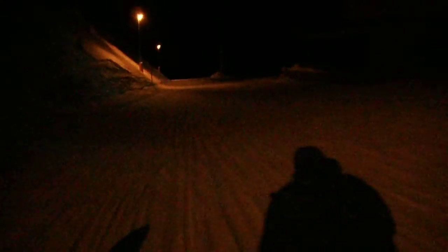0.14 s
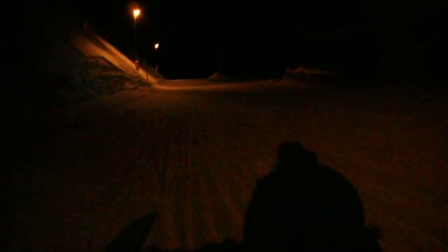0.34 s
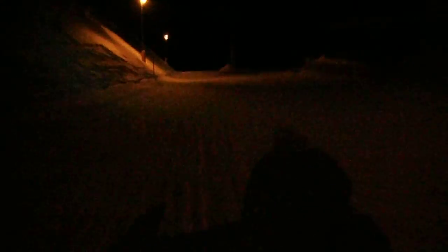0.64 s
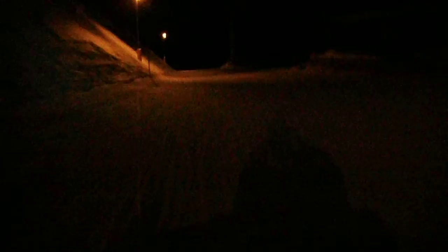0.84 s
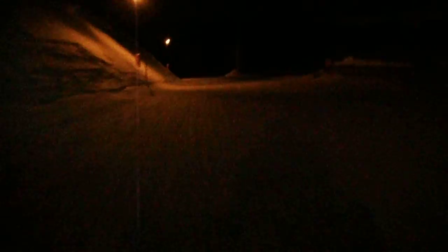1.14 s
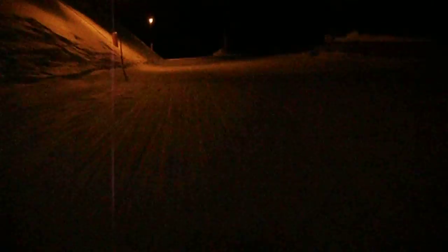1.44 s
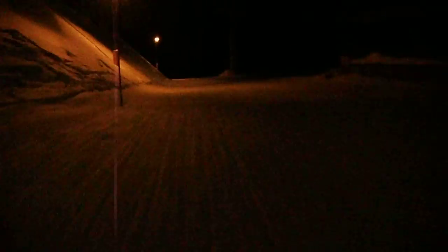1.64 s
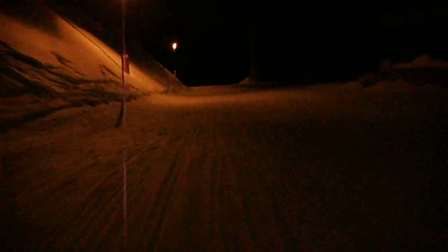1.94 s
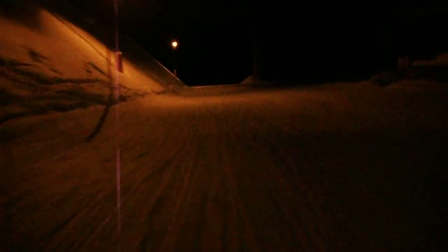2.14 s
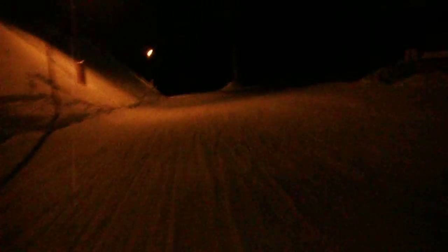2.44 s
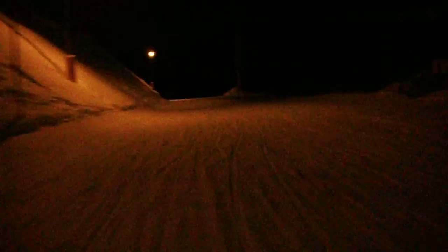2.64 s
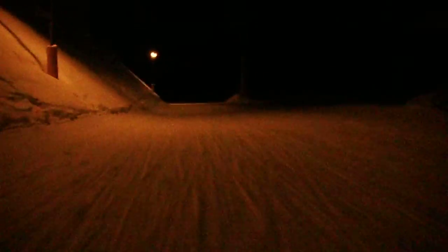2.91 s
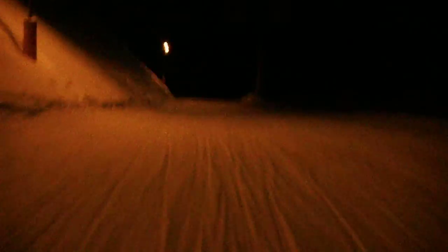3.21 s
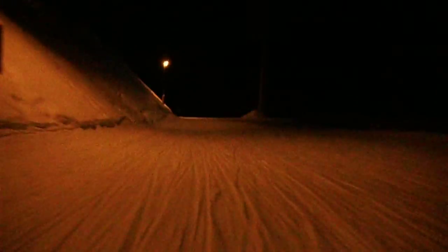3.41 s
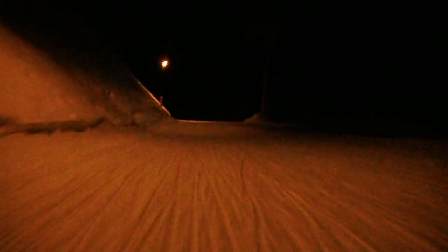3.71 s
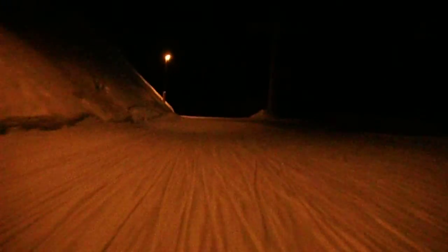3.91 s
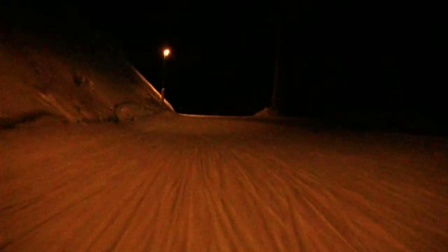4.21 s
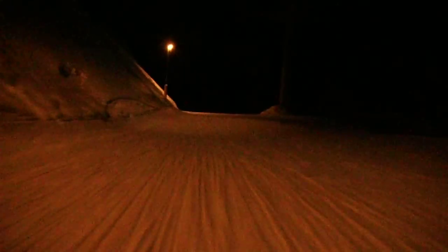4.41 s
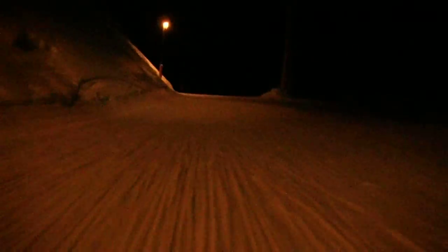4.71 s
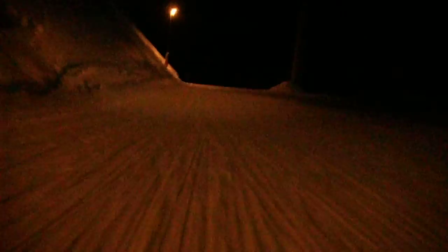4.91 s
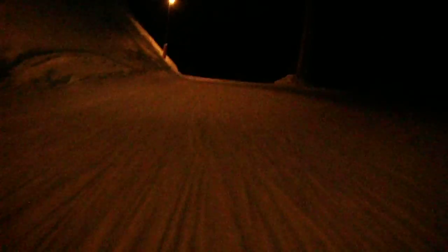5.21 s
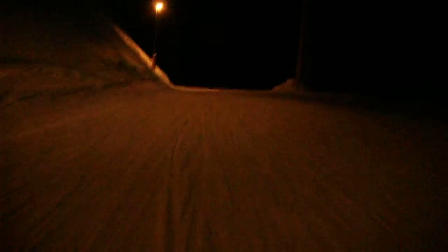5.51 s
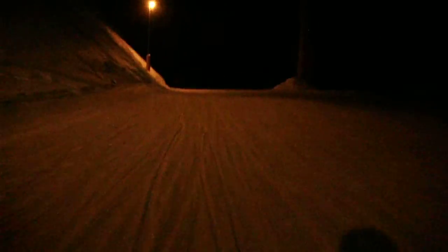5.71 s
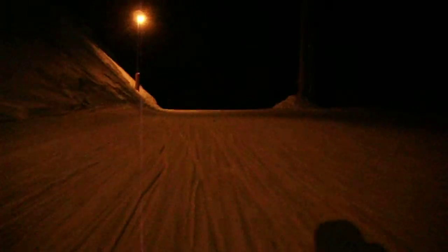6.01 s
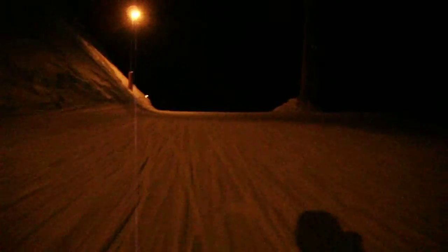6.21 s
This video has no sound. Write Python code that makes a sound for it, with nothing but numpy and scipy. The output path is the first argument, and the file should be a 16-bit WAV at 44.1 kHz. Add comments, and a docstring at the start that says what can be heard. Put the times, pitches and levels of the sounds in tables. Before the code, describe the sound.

A sled slides quickly down packed snow, giving a constant bright hiss and grainy scrape above a weak low rumble. Almost a second in, a short creak leads to a hard cracking bump that overloads the microphone; the sound drops suddenly and swells back. Scraping surges soon after, then continues with small crust cracks and faint thumps. Outdoors, close and dry, from a small microphone in a closed case.

```python
"""Snow grains scrape and spray under a sled's hull sliding over packed snow, above a low rumble.
Filtered noise makes the scrape, spray and rumble; short noise bursts make lumps of crust crack.
Damped sines thump, a narrow resonance creaks and thin steady tones whine.
One small mono microphone in a closed case hears it all, the same on both channels.
One hard bump overloads the input: the gain control ducks, then climbs back."""
import sys
import numpy as np
from scipy import signal
from scipy.fft import rfft, irfft
from scipy.io import wavfile

SR = 44100
rng = np.random.default_rng(int(sys.argv[2]) if len(sys.argv) > 2 else 0)


def wav_record(signal):
    """Record a signal, one row per channel, as 16-bit PCM in the file named by sys.argv[1]."""
    frames = np.transpose(np.atleast_2d(signal))
    bounded = np.clip(frames, -1, 1)
    # unit amplitude maps onto the largest positive 16-bit level
    quanta = np.round(bounded * 32767).astype(np.int16)
    wavfile.write(sys.argv[1], SR, quanta)


def rack_gain(trim_db):
    """Turn a fader trim in dB into the linear factor to multiply a signal by."""
    fader = np.asarray(trim_db, float)
    return 10 ** (fader / 20)


N = 280035  # samples

# colour of snow sounds through the case: (frequency [Hz], relative density [dB per Hz])
SNOW_COLOUR = [(410, -49), (700, -24), (1360, -16.5), (1500, -10), (1880, -2), (2330, -2.5), (2540, -1),
               (4050, -5), (6380, -10), (8280, -4.5), (9430, -7.5), (11900, -7), (13800, -24.5),
               (15700, -29)]
# resonances of the case, added to a colour: (centre [Hz], width [Hz], height [dB])
CASE_RESONANCES = [(1900, 330, 1), (2576, 240, 4), (3136, 390, 4.5), (3680, 120, 3.5), (5650, 1800, 2.5),
                   (8230, 1360, 5.5), (10400, 630, 3)]


def rms_one(x):
    """Normalisation: scale a signal to unit rms."""
    return x / np.sqrt(np.mean(x ** 2) + 1e-20)


def in_time(rows):
    """Linear interpolation: the columns of a curve at every sample."""
    s, *columns = np.transpose(rows)
    return [np.interp(np.arange(N) / SR, s, c) for c in columns]


def drift(rate_hz):
    """Low-pass random process of unit rms: white noise twice through a one-pole filter."""
    r = np.exp(-2 * np.pi * rate_hz / SR)
    wander = signal.lfilter([1], [1, -2 * r, r * r], rng.standard_normal(N + SR))
    return rms_one(wander[SR:])  # the first second lets the filter settle


def resonance(x, hz, width_hz):
    """Damped resonator: a pole pair whose radius sets the width, with gain about 1 on top."""
    r = np.exp(-np.pi * width_hz / SR)
    zeros = [(1 - r * r) / 2, 0, (r * r - 1) / 2]
    poles = [1, -2 * r * np.cos(2 * np.pi * hz / SR), r * r]
    return signal.lfilter(zeros, poles, x)


def colour(x, spectrum, modes=()):
    """Minimum-phase filtering: a folded cepstrum gives the response; white noise keeps its rms."""
    hz = np.fft.rfftfreq(4096, 1 / SR) + 1  # the 1 avoids log(0)
    corner_hz, corner_db = np.transpose(spectrum)
    db = np.interp(np.log(hz), np.log(corner_hz), corner_db)
    for centre, width, top_db in modes:
        db = db + top_db / (1 + (2 * (hz - centre) / width) ** 2)
    cepstrum = irfft(np.log(rack_gain(db)))
    cepstrum[1:2048] *= 2
    cepstrum[2049:] = 0
    response = irfft(np.exp(rfft(cepstrum)))
    return signal.fftconvolve(x, response / np.sqrt(np.sum(response ** 2)))[:N]


def whines():
    """Pure tones: steady sinusoids from the electronics."""
    # electronic tones: (frequency [Hz], rms level ahead of the gain control [dB])
    tones = [(11719, -61), (15676, -72), (15735, -60)]
    t = np.arange(N) / SR
    return sum(rack_gain(db) * np.sqrt(2) * np.sin(2 * np.pi * hz * t) for hz, db in tones)


def rumble(bite_db):
    """Low-frequency turbulence and vibration: lumpy noise of wind on the case and the hull shaking."""
    # colour of the rumble: (frequency [Hz], relative density [dB per Hz])
    low_colour = [(8.8, -32), (15, 0.5), (44, -1), (96, -7), (301, -5.5), (400, -9), (532, -6.5),
                  (777, -15), (1400, -14.5), (1820, -29), (3080, -120)]
    start_db, sag_db_per_s = -38.5, 0.53
    follows = 0.41  # share of the bite's swing
    faded_db = start_db - sag_db_per_s * np.arange(N) / SR
    level_db = faded_db + follows * (bite_db - bite_db.mean())
    lumps = rack_gain(0.4 * drift(28) + 0.89 * drift(56) + 0.72 * drift(4.9))
    noise = rms_one(lumps * rng.standard_normal(N))
    return rack_gain(level_db) * colour(noise, low_colour)


def thumps():
    """Damped free vibration: each bump sets off a few decaying cycles of the hull."""
    # hull on bumps: (time [s], level, above the actual peak [dB], frequency [Hz])
    bumps = [(0.738, -26, 227), (.922, -32, 95), (.925, -25, 205), (.928, -18.5, 463), (1.033, -29, 200),
             (2.36, -27, 700), (2.37, -26.5, 247), (2.599, -38, 318), (4.754, -29, 297), (5.03, -26.5, 443),
             (5.323, -27.5, 473)]
    out, t = np.zeros(N), np.arange(4096) / SR
    for s, level_db, hz in bumps:
        cycles = t * hz
        envelope = cycles * np.exp(1 - cycles / 0.89) / 1.5
        at = round(s * SR)
        out[at:at + len(t)] += rack_gain(level_db) * np.sin(2 * np.pi * cycles) * envelope
    return out


def creak():
    """Excited resonance: slips, taken as noise, ring one narrow mode of the hull before the bump."""
    start_s, rise_s, hold_s, fall_s = 0.855, .015, .055, .01
    level_db, mode_hz, width_hz = -29.5, 1510, 120  # rms while held; width of each of two stages
    corners = start_s + np.cumsum([0, rise_s, hold_s, fall_s])
    envelope = np.interp(np.arange(N) / SR, corners, [0, 1, 1, 0])
    ringing = resonance(rng.standard_normal(N), mode_hz, width_hz)
    ringing = resonance(ringing, mode_hz, width_hz)
    return rack_gain(level_db) * envelope * rms_one(ringing)


def small_cracks():
    """Random fracture: crack rows drawn uniformly in time, level, frequency and length."""
    count = 14
    # lowest and highest time [s], peak [dB], centre [Hz], burst length [ms]
    ranges = np.array([(0, N / SR - .1), (-24, -9.5), (2400, 3400), (3, 8.5)])
    low, high = ranges.T
    return list(low + rng.random((count, 4)) * (high - low))


def cracks():
    """Brittle fracture: each crack is a short burst of splinters, part around its pitch, part broad."""
    # crust cracks: (time [s], peak ahead of the gain control [dB], centre [Hz],
    # burst length before ringing [ms])
    crust = [(0.042, -22, 2500, 4.7), (0.416, -17, 3050, 4.4), (.463, -9.5, 2250, 4), (.897, -12, 4500, 7),
             (.903, -6.5, 2500, 6), (.909, -10, 1900, 9), (.9265, -7, 2300, 6), (.9290, 0, 4700, 3),
             (.9335, 0, 3300, 7), (.962, -7, 3340, 6), (.976, -9, 2600, 3), (.982, -12, 3200, 4),
             (.992, -10, 2700, 4), (1.0, -10, 4500, 4), (1.031, -10, 1900, 7), (1.609, -10, 3220, 5),
             (2.358, -14, 2450, 8.8), (2.444, -10, 5000, 6), (2.853, -15, 2870, 3.7), (2.883, -11, 3290, 4),
             (3.091, -16, 3150, 5), (3.114, -12, 2580, 3.8), (3.128, -15, 2630, 4.7),
             (3.554, -7.5, 3170, 7.9), (3.797, -10, 3000, 8.5), (3.93, -10, 1900, 2.9),
             (4.325, -8.5, 3320, 4.4), (4.452, -14, 2570, 5), (5.309, -10, 2730, 2.9),
             (5.328, -9.5, 3300, 3.4)]
    out, t = np.zeros(N), np.arange(2048) / SR
    rows = crust + small_cracks()
    splinters = rng.standard_normal((len(rows), len(t)))
    for (s, peak_db, hz, ms), noise in zip(rows, splinters):
        shape = np.sin(np.pi * np.minimum(t / ms * 1000, 1) ** .7)  # quicker rise than fall
        burst = noise * shape
        burst = burst + 3.8 * resonance(burst, hz, 390)
        burst = colour(burst, SNOW_COLOUR, CASE_RESONANCES)[:len(t)]
        at = round(s * SR)
        out[at:at + len(t)] += rack_gain(peak_db) * burst / np.max(np.abs(burst))
    return out


def grains(per_s, spread_db):
    """Random impulse process: clicks at chance moments, most small and a few large; unit rms."""
    sizes = rack_gain(spread_db * np.minimum(rng.exponential(1, N), 5))
    signs = rng.choice([-1, 1], N)
    return rms_one(sizes * signs * (rng.random(N) < per_s / SR))


def rubbing():
    """Granular friction: dense grain impacts on hiss, fluttering together over the ruts."""
    flutter = rack_gain(0.15 * drift(13) + 0.83 * drift(130))
    crunch = grains(2500, spread_db=2.5) * rack_gain(2.6 * drift(39))
    return rms_one(flutter * (rng.standard_normal(N) + rack_gain(-11.5) * rms_one(crunch)))


def snow(bite_db):
    """Band-wise modulated friction noise: a low scrape and a high spray, each band with own patches."""
    # centres of overlapping bands: (frequency [Hz])
    band_centres = [300, 1400, 1950, 2550, 3150, 3750, 4600, 6200, 8200, 10500, 12500, 16500]
    # coarse snow scrapes low, fine snow high; it tilts the scrape: (time [s], grit frequency [Hz])
    grit_curve = [(0, 2860), (1.5, 2860), (2.2, 2850), (2.4, 2650), (2.72, 2650), (2.9, 2880), (3.3, 2730),
                  (3.55, 2940), (4.15, 2830), (4.35, 2980), (4.7, 2950), (4.9, 2830), (6.35, 2850)]
    # slow change of the spray's level: (time [s], change [dB])
    swell = [(0, 0), (.65, 1.5), (1.04, -1), (1.5, 0), (4.0, 0.5), (5.0, -1), (6.35, 0)]
    spray_from_hz, neutral_hz = 4200, 2850
    spray_gain_db, spray_follows = 1.5, 0.78  # gain at mean bite; share of the bite's swing
    spectrum = rfft(colour(rubbing(), SNOW_COLOUR, CASE_RESONANCES))
    hz = np.fft.rfftfreq(N, 1 / SR)
    grit_octaves = np.log2(in_time(grit_curve)[0] / neutral_hz) + .03 * drift(2.8)
    scrape, spray = 0, 0
    for k, centre in enumerate(band_centres):
        share = np.interp(hz, band_centres, np.eye(len(band_centres))[k])  # shares sum to one
        band = irfft(spectrum * share, N)
        if centre < spray_from_hz:
            tilt_db = 60 * grit_octaves * np.clip(np.log2(centre / neutral_hz), -.2, .2)
            scrape = scrape + band * rack_gain(tilt_db + 0.83 * drift(24))
        else:
            spray = spray + band * rack_gain(0.64 * drift(14.0))
    # the bite scales both, so the spray gives back part of its swing
    swing_db = (spray_follows - 1) * (bite_db - bite_db.mean())
    spray_db = spray_gain_db + in_time(swell)[0] + swing_db
    return rack_gain(bite_db) * (scrape + rack_gain(spray_db) * spray) / np.std(scrape)


def hull_bite():
    """Friction follows contact: how hard the hull bites the snow, in dB, wobbling over small ruts."""
    # bite as level of the scrape, before wobble: (time [s], level [dB])
    slide = [(0.0, -26), (0.3, -27), (0.44, -25), (0.56, -28), (0.7, -24), (0.86, -25.5), (0.96, -23.5),
             (1.04, -24.5), (1.15, -27), (1.24, -25), (1.34, -20), (1.43, -21), (1.54, -27.5), (1.64, -26),
             (1.76, -29.5), (2.0, -26.5), (2.11, -28.5), (2.3, -27.5), (2.37, -24), (2.44, -28),
             (2.65, -24), (2.75, -28.5), (2.84, -24.5), (2.93, -26.5), (3.02, -22.5), (3.1, -22.5),
             (3.15, -26.5), (3.25, -29.5), (3.4, -29), (3.47, -25.5), (3.63, -27), (3.88, -28),
             (4.29, -27.5), (4.34, -26.5), (4.54, -28), (4.75, -27), (4.89, -30.5), (5.02, -27.5),
             (5.19, -29.5), (5.32, -25), (5.52, -30), (5.66, -27.5), (5.99, -29), (6.11, -27),
             (6.35, -26.5)]
    return in_time(slide)[0] + 0.44 * drift(12.4)


def scene():
    """Superposition: the pressures of all sources add at one microphone."""
    bite_db = hull_bite()
    mono = whines() + rumble(bite_db) + thumps() + creak() + cracks() + snow(bite_db)
    return np.array([mono, mono])


def gain_control(x):
    """Dynamic compression: an overload steps the gain down; it holds, then climbs steadily back."""
    overload_db, duck_db, recover_db_per_s = -2, 10, 13
    hold_s, smoothing_s = .03, .004
    t = np.arange(N) / SR
    overload = np.where(np.abs(x) > rack_gain(overload_db), t, -np.inf)
    since = t - np.maximum.accumulate(overload)  # seconds since the latest overload
    cut_db = np.clip(duck_db - recover_db_per_s * (since - hold_s), 0, duck_db)
    r = np.exp(-1 / (smoothing_s * SR))
    smooth_db = signal.lfilter([1], [1, -2 * r, r * r], cut_db) * (1 - r) ** 2
    return rack_gain(-smooth_db)


def roll_off(x):
    """The treble ends steeply here."""
    return signal.sosfilt(signal.butter(12, 15810, fs=SR, output="sos"), x)


def record(dry):
    """Limited dynamic range: the gain control acts, then the converter clips at its ceiling."""
    ducked = dry * gain_control(dry[0])
    mix = np.clip(ducked, -.94, .94)
    return roll_off(mix)


dry = scene()
out = record(dry)
wav_record(out)
```